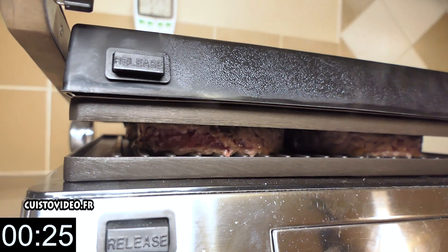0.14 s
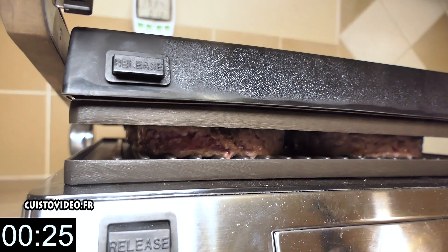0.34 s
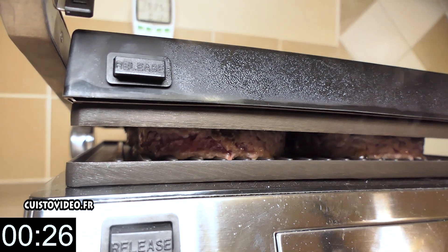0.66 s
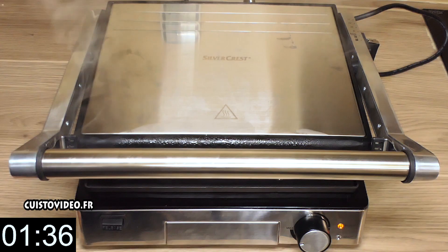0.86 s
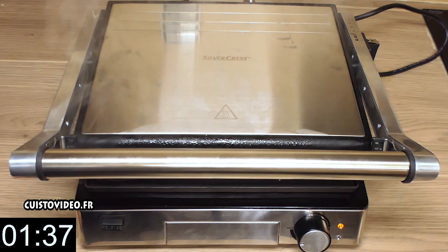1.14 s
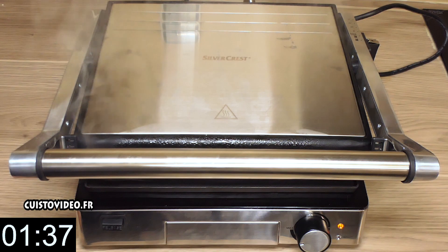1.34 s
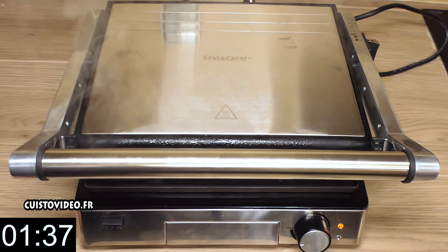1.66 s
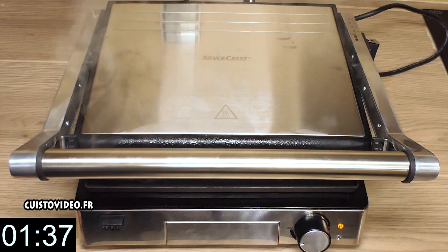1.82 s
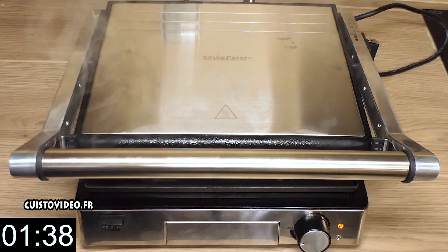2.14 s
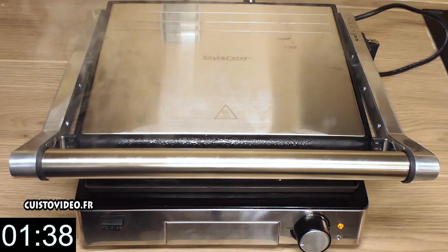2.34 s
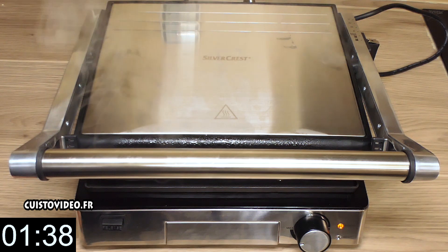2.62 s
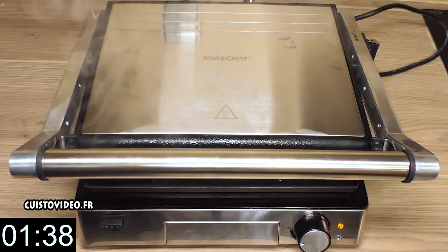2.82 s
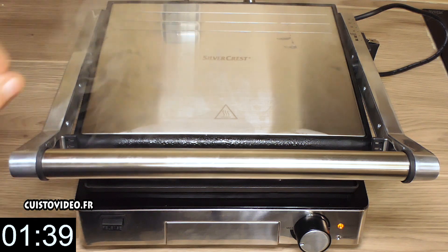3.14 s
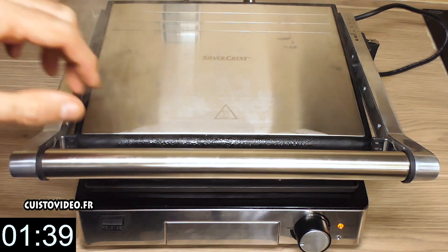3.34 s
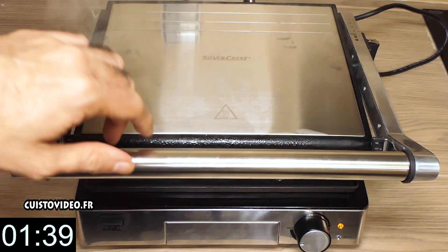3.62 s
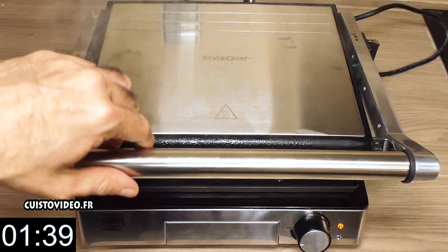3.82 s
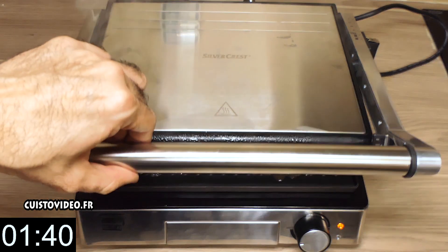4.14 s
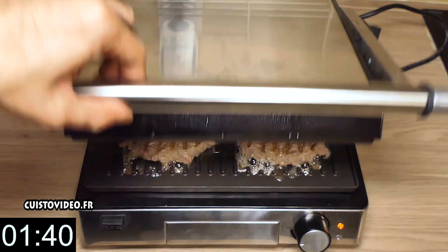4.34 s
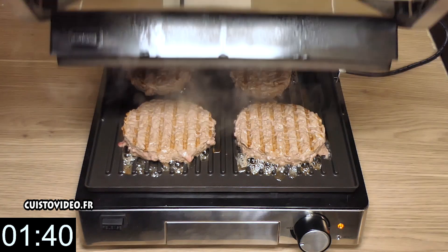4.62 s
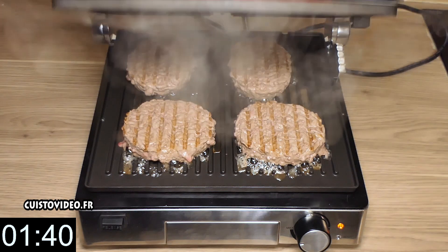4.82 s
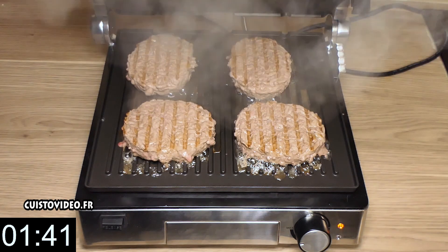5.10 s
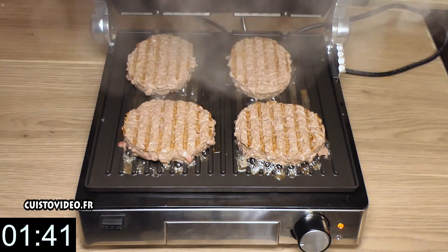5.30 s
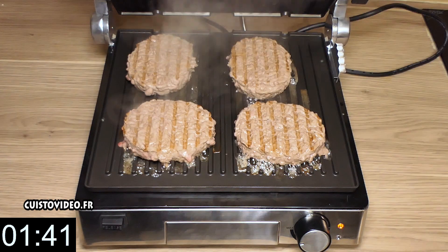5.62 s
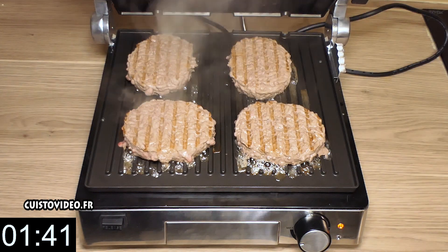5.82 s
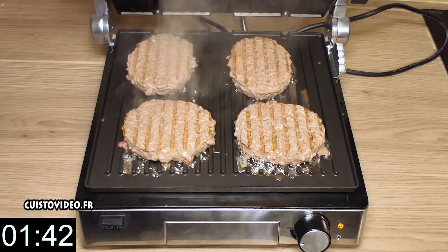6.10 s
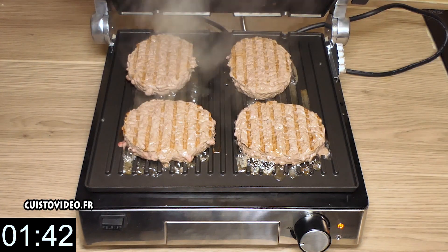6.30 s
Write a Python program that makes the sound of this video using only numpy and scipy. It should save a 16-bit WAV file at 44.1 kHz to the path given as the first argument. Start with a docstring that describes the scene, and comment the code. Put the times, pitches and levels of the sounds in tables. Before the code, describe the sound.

Dense frying hiss, first very close at the gap of a contact grill, jumps to a distant, quieter version over faint rumble and hum. Faint cloth-like rustling precedes a quick cluster of small lid knocks. The sizzle dips, goes muffled, then opens into a looser, crackling sizzle with steam hisses and snapping drops, in stereo with slight hard-walled room echo.

```python
"""In a tiled kitchen, meat patties sizzle in an electric contact grill, heard first close to the gap between
the plates, then from further off before the shut lid. The lid knocks and lifts; the sizzle sinks and returns.
Coloured noise and random bursts make the sizzle, damped sines and noise the spits and knocks, narrow noise
bands the hissing steam pockets. Low noise and a sine give rumble and hum; a low rustle swells as an arm reaches
for the handle."""
import sys
import numpy as np
from scipy import signal
from scipy.fft import rfft, irfft, next_fast_len
from scipy.io import wavfile
from scipy.ndimage import uniform_filter1d, map_coordinates

SR = 44100
rng = np.random.default_rng(int(sys.argv[2]) if len(sys.argv) > 2 else 0)


def put_to_file(sound):
    """Save the sound as 16-bit audio at rate SR, in the file named by the first command-line argument."""
    columns = np.atleast_2d(sound).T  # one column per channel
    safe = np.clip(columns, -1, 1)
    whole_steps = np.round(safe * 32767)
    wavfile.write(sys.argv[1], SR, whole_steps.astype(np.int16))


N = 284886

# Listening point: jump from close to far [s], extra gain while close [dB], upper band limit [Hz]
JUMP_S, CLOSE_DB, TOP_HZ = .8487, 13, 15720
# Inequality of the two microphone ports: (frequency [Hz], left minus right [dB])
PORT_DIFFERENCE = [(60, 3), (110, -1), (200, 0), (380, 1), (700, -3), (1290, 0.5), (2380, -0.5),
                   (4400, 0.5), (8120, -0.5), (15000, 1.5)]
# Stereo width close by, far off and with the lid open: (frequency [Hz], side minus mid [dB])
WIDTH_CLOSE = [(60, -3), (92, 4), (140, -6), (210, -3), (330, -4.5), (500, -6), (770, -10.5), (1170, -7),
               (1790, -5.5), (2740, -8), (4190, -9), (6410, -15.5), (9810, -6.5), (15000, -3.5)]
WIDTH_FAR = [(60, 5), (92, 7), (140, 2), (210, -2), (330, -2), (500, -4), (770, -5.5), (1170, -6.5),
             (1790, -7.5), (2740, -6.5), (4190, -10.5), (6410, -14), (9810, -6.5), (15000, -5)]
WIDTH_OPEN = [(60, 6), (92, 5), (140, 7), (210, 4), (330, 1.5), (500, -4), (770, 1), (1170, -8.5),
              (1790, -6.5), (2740, -8), (4190, -10.5), (6410, -16), (9810, -7), (15000, -3.5)]
# Resonances of plates, worktop and room: (frequency [Hz], width [Hz], relative strength [1])
RESONANCES = [(457, 65, 0.61), (485, 24, 0.5), (583, 25, 0.75), (615, 38, 0.76), (756, 20, 0.6),
              (865, 12, 1.2), (1307, 30, .8), (1475, 82, 1.14), (1760, 36, 1.7), (1835, 150, 1.23),
              (2270, 50, 1.6), (2680, 79, 0.56), (4180, 51, 0.44)]

# Rumble with the sizzle's lowest part, close, far and lid open: (frequency [Hz], relative density [dB])
RUMBLE_CLOSE = [(12, -73), (20, -44), (95, -22), (135, -19), (165, -10), (315, -11.5), (352, -5.5),
                (461, -16), (532, -16), (792, -11.5), (900, 0), (1170, -24), (1980, -120)]
RUMBLE_FAR = [(12, -61), (20, -31), (125, -8), (165, -8), (205, 0), (236, 2.5), (524, -2), (604, -1),
              (698, -6.5), (900, -8.5), (1170, -21), (1980, -120)]
RUMBLE_OPEN = [(12, -65), (20, -32), (125, -14.5), (142, -8), (198, -13.5), (236, -7.5), (375, -6),
               (461, -9), (499, -6), (650, -8), (700, -15), (900, -15), (1170, -24), (1980, -120)]
# Far level [dB], change while close before CLOSE_DB [dB], loss after SINK_S [dB/s]
RUMBLE_DB, RUMBLE_CLOSE_DB, RUMBLE_SINKS_DB_S = -60, -3, 2
HUM_DB, HUM_CLOSE_DB, HUM_SINKS_DB_S = -75, -14, 2
SINK_S, HUM_HZ = 4.3, 150.2

# Strokes of rustle: (time [s], hold [s], level [dB], centre [Hz])
RUSTLE_STROKES = [(2.96, .05, -64, 270), (3.086, 0.075, -55, 245), (3.3, 0.17, -61, 244),
                  (3.66, 0.12, -59.5, 290), (3.88, .08, -64, 252), (4.103, 0.073, -57, 242),
                  (4.236, 0.064, -60.5, 283), (6.394, .06, -64, 292)]
# Spectrum of a stroke: (multiple of its centre [1], relative density [dB])
RUSTLE_SPECTRUM = [(.16, -26), (.45, -19), (.62, -12), (.78, -2), (1, 4), (1.3, -3), (1.7, -22.5)]
RUSTLE_RISE_DB_S, RUSTLE_FALL_DB_S = 79, 57

# The lid shifts on its hinge: (time [s], peak level before the high-pass [dB])
KNOCKS = [(4.322, -46), (4.351, -47), (4.358, -39), (4.3654, -40), (4.383, -49), (4.53, -46)]
# Modes of the lid: (frequency [Hz], relative level [dB], 60 dB decay time [s])
LID_MODES = [(290, -5, 0.056), (597, -10, .03), (1200, -0.5, 0.028), (1590, 2, 0.022), (2250, 2, .022),
             (3250, 2, .018), (4000, -4, .01)]

# Pockets of steam under the meat: (time [s], hold [s], frequency [Hz], level [dB])
STEAM_POCKETS = [(4.3, .25, 1296, -68), (4.68, .1, 1300, -67), (4.78, .22, 1740, -65),
                 (4.8, .33, 2820, -66), (4.8, .28, 3900, -62), (4.84, 0.22, 1520, -68),
                 (4.85, .06, 7000, -60), (4.88, .1, 5700, -62), (5.17, .07, 6400, -60),
                 (5.2, 0.27, 1570, -67.5), (5.2, .2, 1980, -69), (5.34, .14, 4050, -61),
                 (5.38, .15, 5800, -63), (5.48, .08, 7100, -63), (5.8, .2, 2950, -68), (5.8, .1, 6260, -60),
                 (5.8, .16, 5500, -62), (5.17, .07, 10500, -59), (5.4, .1, 10700, -60),
                 (5.84, .14, 10200, -62), (5.84, .2, 1750, -66)]
POCKET_WIDTH, POCKET_RISE_S, POCKET_FALL_S = 0.059, 0.027, .05  # width over frequency

# Bursting drops: (time [s], peak level before pan and high-pass [dB], fizz above body [dB])
SPIT_DROPS = [(4.548, -43, -3), (5.153, -33, 6), (5.3844, -31.5, -2), (5.3994, -32.5, 4), (5.4084, -34, -2),
              (5.4604, -33.5, 6), (5.4954, -33.5, 6), (5.8074, -34, -6), (5.825, -33.5, -6),
              (5.8634, -34, -4), (5.872, -33.5, -4), (5.9474, -30, 2), (6.0463, -21.5, 7),
              (6.1025, -35, -8), (6.2008, -31.5, 8), (6.2174, -31.5, 6), (6.344, -29, -2)]
# Body and fizz of a drop: (frequency [Hz], 60 dB decay time [s])
DROP_MODES = [(5600, 0.0027), (10300, 0.0027)]
SPIT_PAN_DB = -3  # left minus right
SPATTER_S, SPATTER_DB = 0.018, -15  # droplets around each spit: spread in time, level under it

# Movement of the lid: (time [s], opening [0-1])
LID_OPENING = [(0, 0), (4.14, 0.05), (4.3, 0.2), (4.64, 0.92), (4.72, 0.87), (6.46, 0.99)]
# Steady sizzle as heard from far: (time [s], body level [dB], extra treble [dB])
SIZZLE_LEVEL = [(0, -48, 0), (2.6, -48, -0.5), (3.2, -48, -.5), (4.12, -48.5, 0), (4.19, -49.5, -1.5),
                (4.26, -54, -1), (4.35, -56.5, -1), (4.45, -59, 2.5), (4.65, -58, -8), (4.75, -54.5, -1.5),
                (4.95, -53.5, -1.5), (5.12, -53.5, -1.5), (5.31, -54.5, 0), (5.6, -54, 1),
                (5.78, -54.5, 1.5), (6.05, -54.5, 2), (6.46, -55.5, -0.5)]
# Fat runs onto the plate: (time [s], hold [s], swell [dB], extra fizz and air [dB])
FAT_SPURTS = [(4.533, .005, 5.5, -4), (4.657, 0.035, 2, 3.5), (4.792, 0.092, 2, -1), (5.034, 0.018, 1, -1),
              (5.14, 0.089, 1.5, 2), (5.34, 0.08, 3, -1), (5.45, .06, 2, -1), (5.797, 0.08, 3, -2.5),
              (5.926, 0.075, 0.5, 1), (6.19, .03, -0.5, .5), (6.37, .03, 1, -0.5)]
SPURT_RISE_S, SPURT_FALL_S = 0.015, 0.032
# Share of the swell in dB that reaches each part
SPURT_LOW, SPURT_FIZZ, SPURT_AIR, SPURT_CRACKLE = 0.26, 0.96, 1.4, .6
# Sizzle at the gap, lid shut, half way up and open: (frequency [Hz], relative density [dB])
GAP_SPECTRUM = [(290, -49), (500, -21), (770, -16), (929, -7.5), (1070, -3.5), (1220, -16), (1400, -7),
                (1560, -10), (1720, -3.5), (1930, -8), (2200, -5.5), (2450, -3), (2700, -5), (2980, -3.5),
                (3500, -5), (4530, -7), (5250, -5), (5700, -5.5), (6000, -3.5), (6800, 0.5), (7500, -2.5),
                (8410, -5), (10700, 1.5), (12000, -2.5), (13700, -7.5), (15600, -15.5)]
SHUT_SPECTRUM = [(290, -33), (500, -21), (696, -16), (748, -10), (1100, -4), (1310, -5), (1800, -1.5),
                 (2020, -3), (2900, -2.5), (4030, -3), (4700, -6.5), (5300, -6), (5900, -5.5), (6700, -3),
                 (8650, -6), (10000, -2), (10900, -1.5), (12200, -7), (13700, -6.5), (15600, -20.5)]
RISING_SPECTRUM = [(290, -59), (500, -30), (620, -1), (950, -2.5), (1290, 2), (1900, -4), (2600, -8),
                   (3500, -8.5), (4100, -12.5), (5000, -20), (7000, -22), (8700, -24), (10700, -24),
                   (15600, -40)]
OPEN_SPECTRUM = [(410, -30), (700, -26), (767, -27), (956, -11), (1210, -7.5), (1530, -5.5), (2340, -7.5),
                 (2850, -5.5), (4040, -5), (4670, -8), (5300, -6), (5820, -5.5), (7000, -6), (8260, -8),
                 (10200, -4), (11000, -6), (12300, -11), (13700, -13.5), (15600, -24.5)]
# Edges between low seethe, body, fizz and air: (frequency [Hz])
BAND_EDGES = 4300, 7500, 11800
OPEN_PAN_DB = -0.2  # left minus right once the lid is up


def amp(db):
    """Level and amplitude: 20 dB are a factor of ten."""
    return 10 ** (np.asarray(db) / 20)


def unit(x):
    """Normalisation to a root mean square of one."""
    return x / np.sqrt(np.mean(x ** 2) + 1e-20)


def along(points, hz):
    """Interpolation of a spectrum on a logarithmic frequency axis."""
    f, v = np.transpose(points)
    return np.interp(np.log(hz + 1), np.log(f + 1), v)


def curves(table):
    """Linear interpolation in time of each column after the first."""
    s, *columns = np.transpose(table)
    return [np.interp(np.arange(N) / SR, s, column) for column in columns]


def wobble(rate):
    """Slow fluctuation: a spline through random knots, rate of them a second."""
    knots = rng.standard_normal(int(N * rate / SR) + 4)
    return map_coordinates(knots, [np.arange(N) * rate / SR])


def pulse(start, rise, hold, fall):
    """Trapezoidal envelope: a straight rise, a hold and a straight fall [s]."""
    corners = np.cumsum([start, rise, hold, fall])
    return np.interp(np.arange(N) / SR, corners, [0, 1, 1, 0])


def filtered(x, response):
    """Linear filtering: the spectrum is multiplied by a response of frequency."""
    m = next_fast_len(N + SR // 2)
    return irfft(rfft(x, m) * response(np.fft.rfftfreq(m, 1 / SR)), m)[..., :N]


def without_bass(x, edge):
    """Inefficient radiation by small bodies: the response falls below the edge [Hz]."""
    return filtered(x, lambda hz: 1 / (1 + (edge / (hz + 1)) ** 4))


def coloured(pair, spectrum, width=WIDTH_FAR, rings_db=0):
    """Minimum-phase filtering: a causal colour on mid and side, then their sum and difference."""
    def response(hz):
        bumps = sum(strength / (1 + (2 * (hz - centre) / w) ** 2) for centre, w, strength in RESONANCES)
        level = along(spectrum, hz) + rings_db * bumps
        # folding the cepstrum onto positive time makes the filter causal
        cepstrum = irfft(np.log(amp(level) + 1e-6))
        half = len(cepstrum) // 2
        cepstrum[1:half] *= 2
        cepstrum[half + 1:] = 0
        return np.exp(rfft(cepstrum)) * [np.ones_like(hz), amp(along(width, hz))]
    mid, side = filtered(pair, response)
    return np.array([mid + side, mid - side])


def rumble():
    """Broadband room noise: one low noise takes the colour of each listening condition."""
    t = np.arange(N) / SR
    near = t < JUMP_S
    level = RUMBLE_DB + RUMBLE_CLOSE_DB * near - RUMBLE_SINKS_DB_S * np.maximum(t - SINK_S, 0)
    noise = rng.standard_normal((2, N))
    lid, = curves(LID_OPENING)
    shut = unit(coloured(noise, RUMBLE_FAR, rings_db=6.0))
    opened = unit(coloured(noise, RUMBLE_OPEN, WIDTH_OPEN, rings_db=6.5))
    far = (1 - lid) * shut + lid * opened
    close = unit(coloured(noise, RUMBLE_CLOSE, WIDTH_CLOSE))
    return amp(level) * np.where(near, close, far)


def hum():
    """Mains hum: a pure tone whose level wavers slightly."""
    t = np.arange(N) / SR
    level = HUM_DB + HUM_CLOSE_DB * (t < JUMP_S) - HUM_SINKS_DB_S * np.maximum(t - SINK_S, 0)
    return amp(level + 0.43 * wobble(5.8)) * np.sqrt(2) * np.sin(2 * np.pi * HUM_HZ * t)


def rustle():
    """Band-shaped noise: each stroke of the arm has its own centre and exponential rise and fall."""
    out, t = 0, np.arange(N) / SR
    for s, hold, db, centre in RUSTLE_STROKES:
        rise = RUSTLE_RISE_DB_S * np.maximum(s - t, 0)
        fall = RUSTLE_FALL_DB_S * np.maximum(t - s - hold, 0)
        band = [(centre * multiple, level) for multiple, level in RUSTLE_SPECTRUM]
        noise = rng.standard_normal((2, N)) * [[1], [.6]]
        out = out + amp(db - rise - fall) * unit(coloured(noise, band))
    return out


def knock():
    """Modal vibration: each contact rings the lid's damped modes, a little differently every time."""
    out, t = np.zeros(N), np.arange(SR // 10) / SR
    for s, db in KNOCKS:
        ring = 0
        for hz, level, t60 in LID_MODES:
            decay = amp(level + rng.normal(0, 1.8) - 60 * t / t60)
            ring = ring + decay * np.sin(2 * np.pi * hz * t * amp(rng.normal(0, 0.41)))
        dull_noise = uniform_filter1d(rng.standard_normal(len(t)), size=5)
        ring = ring + 1.1 * amp(-60 * t / 0.018) * dull_noise
        ring = ring * (1 - np.exp(-t / 0.00067))  # soft onset
        out[round(s * SR):][:len(t)] += amp(db) * ring / np.abs(ring).max()
    return without_bass(out, 250)  # the lid is too light to push bass


def pockets():
    """Resonant filtering of noise: steam pockets open, flutter and close, each at its own pitch."""
    out = 0
    for s, hold, hz, db in STEAM_POCKETS:
        shape = pulse(s - POCKET_RISE_S, POCKET_RISE_S, hold, POCKET_FALL_S)
        noise = rng.standard_normal((2, N))
        mid, side = filtered(noise, lambda f: 1 / (1 + (2 * (f - hz) / (POCKET_WIDTH * hz)) ** 2))
        hiss = unit(np.array([mid + 0.3 * side, mid - .35 * side]))
        out = out + amp(db + 2.6 * wobble(18)) * shape * hiss
    return out


def spits():
    """Impulsive radiation: bursting fat drops give damped clicks, each amid a few weaker droplets."""
    out, t = np.zeros(N), np.arange(SR // 100) / SR
    droplets = []
    for s, db, fizz_db in SPIT_DROPS:
        for offset, weaker in rng.standard_normal((4, 2)):
            droplets.append((s + SPATTER_S * offset, db + SPATTER_DB - 2.5 * abs(weaker), fizz_db))
    for s, db, fizz_db in SPIT_DROPS + droplets:
        body, fizz = (amp(-60 * t / t60) * np.sin(2 * np.pi * hz * t * amp(rng.normal(0, 0.59)))
                      for hz, t60 in DROP_MODES)
        spray = 0.34 * amp(-60 * t / 0.004) * rng.standard_normal(len(t))
        click = (body + amp(fizz_db) * (fizz + spray)) * (1 - np.exp(-t / .0001))
        start = round((s + .0011) * SR)  # every click starts 1.1 ms after its listed time
        out[start:start + len(t)] += (amp(db) * click / np.abs(click).max())[:N - start]
    out = out * amp([[SPIT_PAN_DB / 2], [-SPIT_PAN_DB / 2]])
    return without_bass(out, 1500)  # a drop is too small to push bass


def patches(pair, depth_db):
    """Random modulation: the gain varies in patches of time and frequency."""
    z = signal.stft(pair, nperseg=512)[2]
    field = uniform_filter1d(rng.standard_normal(z.shape[1:]), size=5, axis=0)
    field = uniform_filter1d(field, size=8, axis=1)
    return signal.istft(z * amp(depth_db * unit(field)), nperseg=512)[1][:, :N]


def bursts(rate, scatter_db, clump_db, biggest):
    """Random impulse process: steam bubbles burst in clumps, at random places and in widely varied sizes."""
    when = rng.random(N) < rate * amp(clump_db * wobble(25)) / SR
    place = np.array([np.ones(N), rng.standard_normal(N)])  # mid and side
    size = amp(scatter_db * np.minimum(rng.exponential(size=N), biggest))
    impulses = when * size * np.sign(rng.standard_normal(N))
    return unit(signal.lfilter([1, -.6], [1], impulses * place))  # sharpened by a differencing filter


def swells():
    """Superposition in dB: the spurts' whole swell and extra fizz rise fast, hold and fall slower."""
    return sum(np.array([[db], [fizz_db]]) * pulse(s, SPURT_RISE_S, hold, SPURT_FALL_S)
               for s, hold, db, fizz_db in FAT_SPURTS)


def bands(x):
    """Band splitting: low seethe, body and the fizz-air sum each get a mid deviation of one."""
    low, middle, most = (filtered(x, lambda hz: 1 / (1 + (hz / edge) ** 6)) for edge in BAND_EDGES)
    body = middle - low
    top = np.std((x - middle).mean(0))
    return low / np.std(low.mean(0)), body / np.std(body.mean(0)), (most - middle) / top, (x - most) / top


def sizzle():
    """Boiling noise: steam hiss plus bursts; the open plate lets more single bursts be heard."""
    body_db, treble_db = curves(SIZZLE_LEVEL)
    lid, = curves(LID_OPENING)
    swell_db, spray_db = swells()
    near = np.arange(N) < JUMP_S * SR
    steam = rng.standard_normal((2, N))
    hiss = (1 - lid) * patches(steam, depth_db=0.93) + lid * unit(patches(steam, depth_db=1.0))
    crackle = bursts(rate=2400, scatter_db=4.0, clump_db=1.5, biggest=3.9)
    crackle = amp(SPURT_CRACKLE * swell_db) * crackle
    flutter_db = np.where(near, .15, 0.094 + .4 * lid) * wobble(15) + (0.35 + 0.16 * lid) * wobble(45)
    shut, opened = np.clip(1 - 2 * lid, 0, 1), np.clip(2 * lid - 1, 0, 1)
    rising = 1 - shut - opened
    # (presence [0-1], spectrum, width, resonances [dB], crackle against hiss [1],
    #  low seethe above body [dB], fizz and air above body [dB])
    views = [(near, GAP_SPECTRUM, WIDTH_CLOSE, 0, .3, -1.4, -.7),
             (~near * shut, SHUT_SPECTRUM, WIDTH_FAR, 3, .3, -1.2, .1),
             (~near * rising, RISING_SPECTRUM, WIDTH_OPEN, 1.5, .35, 1.5, -4),
             (opened, OPEN_SPECTRUM, WIDTH_OPEN, 1, .6, -.8, 2.2)]
    out = 0
    for presence, spectrum, width, rings_db, share, low_db, fizz_db in views:
        source = (hiss + share * crackle) * amp(flutter_db)
        low, body, fizz, air = bands(coloured(source, spectrum, width, rings_db))
        treble = amp(SPURT_FIZZ * swell_db) * fizz + amp(SPURT_AIR * swell_db) * air
        treble = amp(fizz_db + treble_db + spray_db) * treble
        seethe = amp(low_db + SPURT_LOW * swell_db) * low
        out = out + presence * (seethe + amp(swell_db) * body + treble)
    return amp(body_db + opened * OPEN_PAN_DB * np.array([[.5], [-.5]])) * out


def tiles(x, wet_db):
    """Reverberation: hard walls add a dense decaying echo, which ripples the spectrum finely."""
    t = np.arange(SR // 4) / SR
    tail = rng.standard_normal(len(t)) * amp(-60 * t / .3)
    echo = signal.fftconvolve(x, tail[None] / np.linalg.norm(tail), axes=1)[:, :N]
    return x + amp(wet_db) * echo


def scene():
    """Superposition of all sources and their echo, louder until the listening point jumps away."""
    sources = rumble() + hum() + rustle() + knock() + pockets() + spits() + sizzle()
    return tiles(sources, wet_db=-15) * amp(CLOSE_DB * (np.arange(N) < JUMP_S * SR))


def record(dry):
    """Band limiting: nothing above the limit passes, and the microphone ports differ a little."""
    return filtered(dry, lambda hz: (hz < TOP_HZ) * amp(along(PORT_DIFFERENCE, hz) * [[.5], [-.5]]))


dry = scene()
out = record(dry)
put_to_file(out)
```